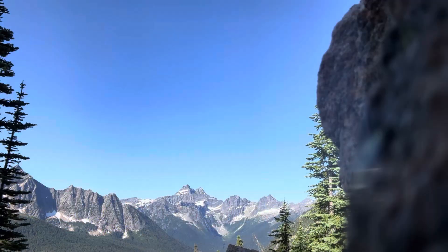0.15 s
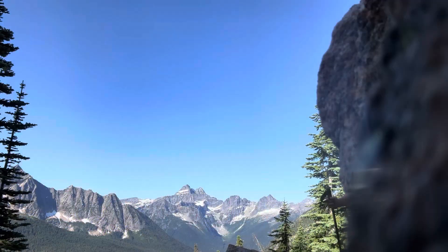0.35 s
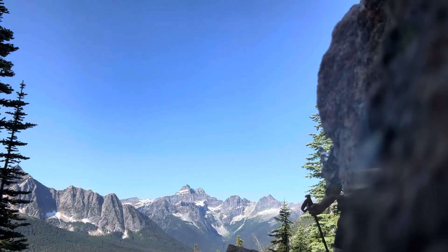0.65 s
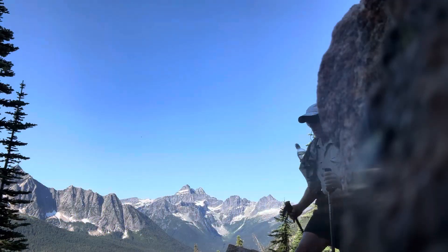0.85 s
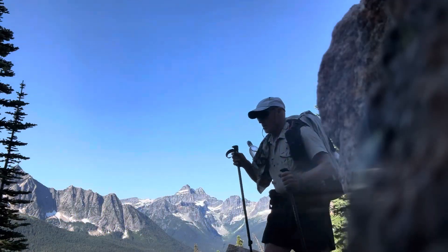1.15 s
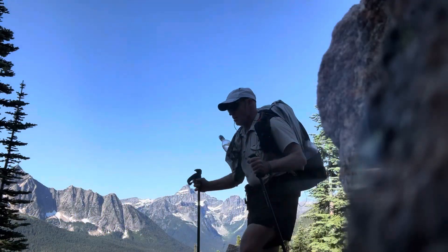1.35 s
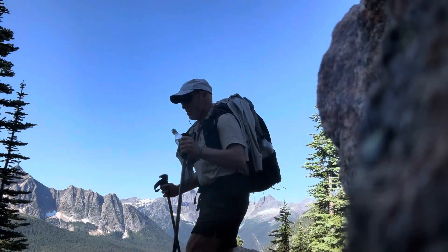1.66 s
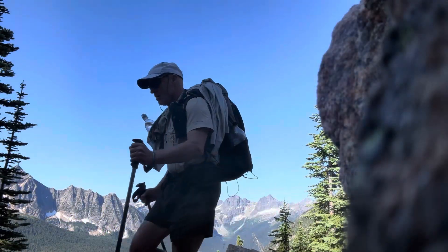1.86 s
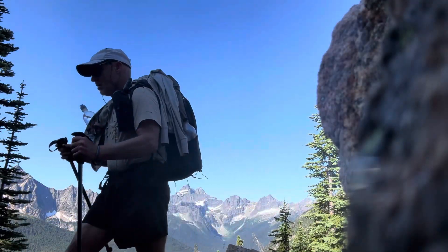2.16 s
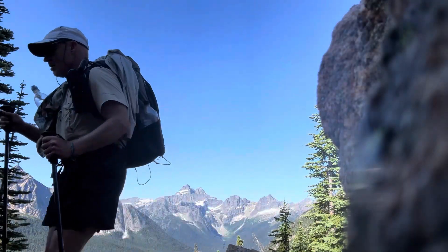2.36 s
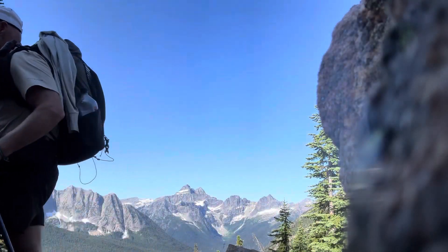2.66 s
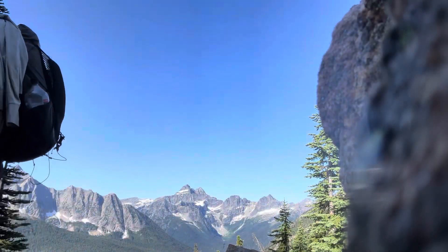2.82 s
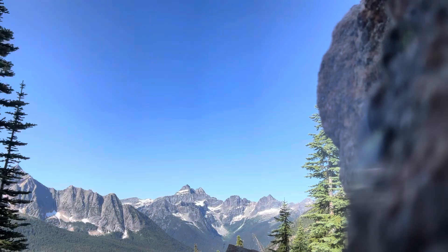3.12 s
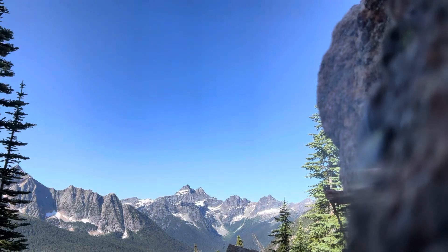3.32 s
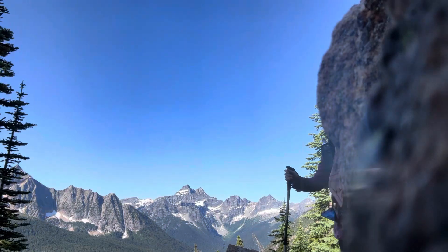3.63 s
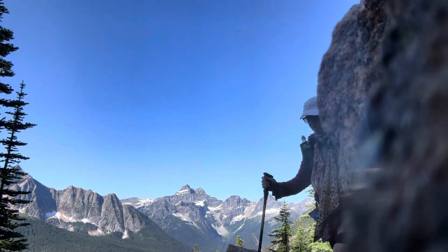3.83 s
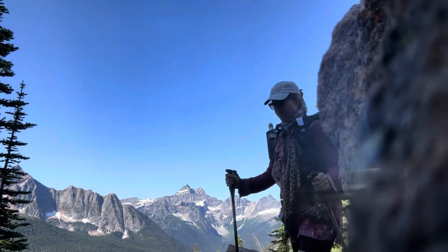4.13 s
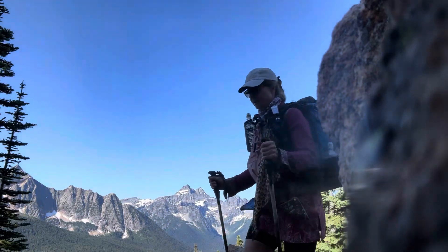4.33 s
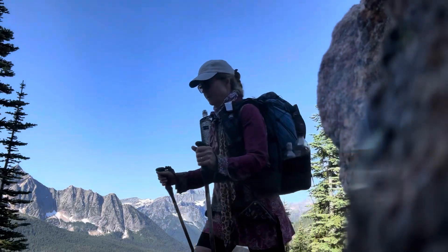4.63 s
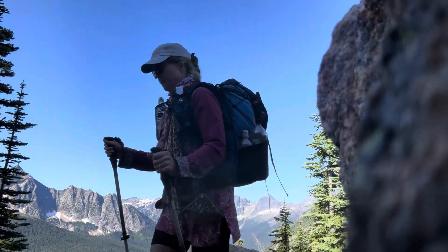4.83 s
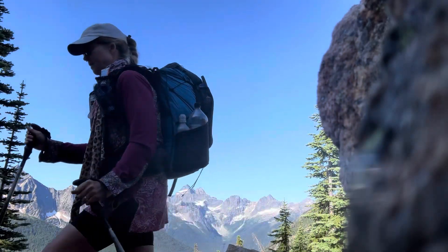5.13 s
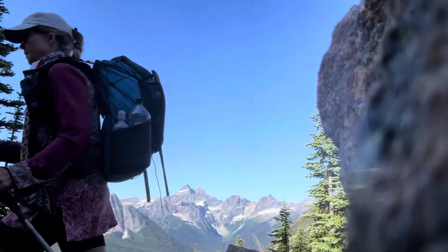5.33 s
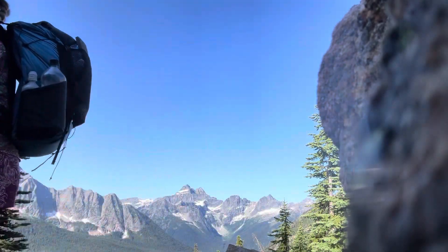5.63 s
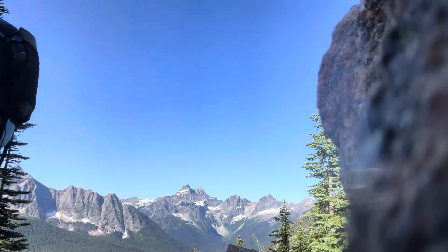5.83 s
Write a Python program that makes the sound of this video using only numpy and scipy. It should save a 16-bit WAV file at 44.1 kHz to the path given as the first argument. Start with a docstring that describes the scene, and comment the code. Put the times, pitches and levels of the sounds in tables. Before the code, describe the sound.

A close stereo outdoor scene on a stony mountain trail as two hikers pass with poles. A crisp pole tip click lands at about 0.3 s, with a light scuff and soft thud near 0.5 s. Around 0.9-1.05 s boots knock stone with low, short thuds, and bright hard clicks crack at 1.4 s. Small grit scrapes and taps follow. From 2.25 to 2.8 s it is busiest: sharp strikes at 2.35 s, the loudest crack at 2.6 s, then rattling small stones and gravel. A heavy thud comes at 3.3 s, a bright pole click at 3.67 s, knocks near 3.85 and 4.05 s. After a lull, a stony knock at 4.55 s leads into a soft scuff; fainter taps continue, with a clearer knock at 5.3 s and light steps to 6 s. Faint cloth swishes, quiet air and a low wavering hum lie underneath; balance eases left to right.

```python
"""On a stony mountain path two walkers with poles pass close by, their balance leaning from left to right.
Pole tips and boot edges crack on rock: bursts of random grit clicks drive damped modes of shafts and stones.
Heels thud as decaying sines that sink in pitch; soles and cloth are clumped grains shaped by strokes.
Coloured noise gives the open air, narrow-band noise a faint wavering hum; two close ports listen."""
import sys
import numpy as np
from scipy import signal
from scipy.fft import rfft, irfft
from scipy.io import wavfile

SR = 44100
rng = np.random.default_rng(int(sys.argv[2]) if len(sys.argv) > 2 else 0)


def store_wav(level_fs):
    """Save 16-bit WAV to argv[1]."""
    pcm = np.round(np.clip(np.atleast_2d(level_fs), -1, 1) * 32767)
    wavfile.write(sys.argv[1], SR, pcm.T.astype(np.int16))


N = 263718


def amp(db):
    """Level law: an amplitude ratio is ten to the power of decibels over twenty."""
    return 10 ** (np.asarray(db) / 20)


def rms_one(x):
    """Power normalisation: scale to a root mean square of 1."""
    return x / np.sqrt(np.mean(x ** 2) + 1e-20)


def in_time(rows):
    """Linear interpolation of each column over the time in the first."""
    s, *columns = np.transpose(rows)
    t = np.arange(N) / SR
    return [np.interp(t, s, column) for column in columns]


def band(x, low_hz, high_hz):
    """Band-pass filtering with maximally flat Butterworth response."""
    sos = signal.butter(2, [low_hz, high_hz], "band", fs=SR, output="sos")
    return signal.sosfilt(sos, x)


def coloured(x, spectrum):
    """Spectral shaping: gains in dB, interpolated over log frequency, weight the spectrum."""
    hz, db = np.transpose(spectrum)
    f = np.maximum(np.fft.rfftfreq(N, 1 / SR), 1)
    gain = amp(np.interp(np.log(f), np.log(hz), db))
    return irfft(rfft(x) * gain, N)


def drift(rate_hz):
    """Low-passed noise: a double pole leaves slow random fluctuation of rms 1."""
    pole = np.exp(-2 * np.pi * rate_hz / SR)
    noise = rng.standard_normal(N + SR)
    slow = signal.lfilter([1], [1, -2 * pole, pole * pole], noise)
    return rms_one(slow[SR:])      # the first second lets the filter settle


def grains(per_s, spread_db):
    """Shot noise: random clicks of uneven size and either sign; rms 1."""
    sizes = amp(spread_db * np.minimum(rng.exponential(1, N), 4))
    signed = sizes * rng.choice([-1, 1], N)
    return rms_one(signed * (rng.random(N) < per_s / SR))


def body(clicks, modes):
    """Modal synthesis: parallel damped resonators, the drive of each wavering in level."""
    out = 0
    for k, (hz, db, t60) in enumerate(modes):
        radius = amp(-60 / (t60 * SR))
        w = 2 * np.pi * hz / SR
        force = clicks * amp(db + 2 * drift(58.6)) * (-1) ** k
        resonator = [1, -2 * radius * np.cos(w), radius * radius]
        out = out + signal.lfilter([0, np.sin(w)], resonator, force + 1e-18)
    return out


def hits():
    """Impact excitation: a blow in a first break, then dying grit, drives shaft, stones and bare crack."""
    # tips, boot edges and kicked stones on rock: start_s, level_db, stone_knock_db and
    # bright_crack_db (both relative to level_db), contact_pitch_hz
    contacts = [(0.2723, -28, -7, -5, 2190), (0.330, -51.5, 10.5, -5, 1420), (0.885, -33, -15, -4, 1780),
                (0.9653, -55, 22.5, -3, 1580), (1.001, -35, 11, -18, 2240), (1.036, -34, 6.5, -25, 1600),
                (1.3755, -24.5, -5.5, 0.5, 3400), (1.3818, -25, -2.5, -33, 1910),
                (1.4072, -39.5, 1, -33, 2220), (1.582, -49, 7, -13, 1640), (1.8648, -43.5, 0.5, 4, 3210),
                (1.903, -41.5, 2.5, -3.5, 2180), (2.0205, -47, 19.5, -14, 1490),
                (2.157, -50, 17.5, 1, 1520), (2.254, -35.5, -7, -15.5, 1830),
                (2.3433, -24.5, -0.5, -14.5, 1780), (2.36, -28, -9, -28, 3520), (2.5067, -32, 6, -41, 1530),
                (2.541, -48, 12.5, -6, 2000), (2.6016, -18.5, -1.5, -23.5, 1960),
                (2.6885, -41, 16.5, -35, 1890), (2.704, -42, 4, -28, 3180), (2.7197, -42, -4, -29, 1470),
                (2.7354, -29.5, -19, -21.5, 4150), (2.787, -31.5, -8, -11, 4050),
                (2.8075, -31, 0, -48, 1510), (2.903, -57.5, -10, 4.5, 3040), (2.9745, -32.5, -3, -14, 1490),
                (3.0874, -37, 1, 1.5, 3050), (3.0947, -38.5, -15, -24, 3600),
                (3.1543, -34.5, -4, -13.5, 1520), (3.1918, -41, 9.5, -3.5, 2890),
                (3.227, -53, 20.5, -17, 1510), (3.292, -52.5, 14, 11, 2550),
                (3.3035, -36.5, 12.5, -8.5, 3800), (3.367, -50.5, 19, -22, 1480),
                (3.422, -37.5, -21, -30, 1520), (3.4586, -33, -37, -24, 4000), (3.5, -38, -5, -29, 3830),
                (3.6668, -26.5, -8.5, -2.5, 3310), (3.8434, -39, -5, -1, 3000),
                (3.8517, -31.5, 3.5, -8, 1420), (3.968, -53, 18.5, -27, 1610),
                (4.0467, -39, 5.5, -15, 1750), (4.538, -40.5, -6, -7, 1830), (4.566, -35, 8.5, -56, 1250),
                (5.0261, -46, -5, -40, 2540), (5.055, -48.5, 0, -16.5, 2730),
                (5.1122, -45.5, 1, -6.5, 1820), (5.2006, -48, -8, -27, 2930), (5.262, -66, 20, -32, 1480),
                (5.2943, -32, 7.5, -24.5, 1760), (5.406, -53.5, 16, -3, 1560),
                (5.7407, -45.5, 9, -16, 2000), (5.8382, -47, 16.5, -41, 1620),
                (5.940, -48.5, 14, -7.5, 1530), (5.96, -41.5, -5, -7, 2450)]
    # pole shaft resonances: pitch_hz, relative_drive_db, t60_s
    shaft_modes = [(1520, 6, 0.01), (1994, 11, 0.0037), (2940, 10, 0.0047), (3202, -1.5, 0.016),
                   (3840, 3, 0.0091), (4026, 5, 0.0051)]
    # loose stone resonances: pitch_hz, relative_drive_db, t60_s
    stone_modes = [(453, -4, 0.014), (585, 5, 0.019), (783.6, -2, 0.054), (965, 10, 0.0063)]
    # colour of the bare crack: frequency_hz, gain_db
    crack_colour = [(2500, -30), (4800, 3.5), (6500, 8.5), (8500, 3.5), (13000, -8.5), (16000, -9)]
    rise_s, first_break_s = 0.0011, 0.002      # time constants
    first_break = 3.66      # height over the crunch, before the rise
    crunch_t60_s = 0.11     # for a crack at 0 dB
    click_db = 19           # the one clean blow, over the contact level
    broad_db = -7           # unpitched share of a contact

    force = np.zeros((4, N))
    grit = rms_one(grains(6000, spread_db=2.2) * amp(2.6 * drift(120)))
    t = np.arange(SR // 5) / SR
    for s, db, knock_db, crack_db, hz in contacts:
        i = round(s * SR)
        t60 = crunch_t60_s * amp(0.17 * crack_db)      # a bright contact bites into grit and crunches longer
        decay = amp(-60 * t / t60) + first_break * np.exp(-t / first_break_s)
        burst = (1 - np.exp(-t / rise_s)) * decay
        breaking = amp(db) * burst[:N - i] / burst.max() * grit[i:i + len(t)]
        bare = amp(crack_db) * breaking      # without the clean blow: the bare crack is breaking grit alone
        breaking[round(rise_s * SR)] += amp(db + click_db) * rng.choice([-1, 1])
        pitched = amp(5) * band(breaking, hz / 1.1, hz * 1.1)
        force[:, i:i + len(t)] += pitched, breaking, amp(knock_db) * breaking, bare

    pitched, broad, stones, bare = force
    broad = band(broad, 1560, 5400)
    knock = amp(-26.5) * body(stones, stone_modes) + amp(6.0) * band(stones, 218, 843)
    ringing = amp(-26.5) * body(pitched + amp(-2.5) * broad, shaft_modes)
    crack = amp(1) * coloured(bare, crack_colour)
    return pitched + amp(broad_db) * broad + ringing + knock + crack


def thuds():
    """Damped oscillation: landing weight rings the ground, sinking in pitch over a deeper, longer ring."""
    # weight landing on the ground: start_s, relative_level_db, first_over_final_pitch (ratio), final_pitch_hz
    landings = [(0.549, -53.5, 1.6, 201), (0.888, -48.5, 1.44, 219), (0.974, -45, 1.56, 220),
                (1.005, -36.5, 2.95, 174), (1.039, -41, 2.14, 164), (1.385, -35, 1.35, 190),
                (1.583, -44.5, 1.75, 160), (2.165, -40, 2, 109), (2.356, -49, 1.1, 95),
                (2.512, -50, 1.45, 165), (2.774, -41.5, 1.5, 223), (2.853, -43, 1.22, 231),
                (2.982, -48, 1.5, 89.5), (3.101, -38, 2.1, 121), (3.156, -46.5, 2.1, 129),
                (3.3055, -30.5, 3.6, 154), (3.382, -43, 1.54, 195), (3.685, -44.5, 3, 120),
                (3.86, -39.5, 1.94, 283), (4.05, -45.5, 2.3, 138), (4.566, -43.5, 1.63, 203),
                (4.654, -48, 1.46, 245), (5.74, -55.5, 1.26, 246), (5.845, -52.5, 2.23, 183),
                (5.929, -49, 1.3, 225), (5.96, -44.5, 1.7, 213)]
    # deep ring under every thud, its pitch scaled at random: base_pitch_hz, relative_level_db, t60_s
    deep_hz, deep_db, deep_t60 = (92, -14, 0.25)
    near_t60_s = 0.055
    rise_s, sink_s = 0.00061, 0.0042      # time constants of the push and of the pitch settling
    thud_gain_db = 13      # overall loudness of the thuds

    out = np.zeros(N)
    t = np.arange(SR // 5) / SR
    for s, db, start, hz in landings:
        i = round(s * SR)
        turns = hz * (t + (start - 1) * sink_s * (1 - np.exp(-t / sink_s)))
        near = amp(-60 * t / near_t60_s) * np.sin(2 * np.pi * turns)
        deep_turns = deep_hz * rng.uniform(0.49, 1.47) * t
        deep = amp(deep_db - 60 * t / deep_t60) * np.sin(2 * np.pi * deep_turns)
        push = amp(db + thud_gain_db) * (1 - np.exp(-t / rise_s))
        out[i:i + len(t)] += (push * (near + deep))[:N - i]
    return out


def rubbing():
    """Granular friction: soles roll stones and crush grit in clumps, cloth hisses, the ground rumbles."""
    # soles drag and settle in gravel: start_s, length_s, rolling_stones_db,
    # grit_db and ground_rumble_db (both relative to the stones)
    scuffs = [(0.181, 0.16, -54.5, -16, -26), (0.29, 0.012, -48.5, 3.5, 2), (0.497, 0.079, -55, -3.5, 1.5),
              (0.895, 0.15, -52.5, -0.5, 8.5), (1.113, 0.022, -53, 1.5, 2),
              (1.488, 0.046, -46.5, -5.5, -3.5), (1.593, 0.011, -47, -4, 5),
              (1.668, 0.0053, -40.5, -2, -13), (2.16, .14, -56.5, 1.5, 3.5), (2.612, 0.14, -47, -8.5, -3),
              (2.749, 0.068, -49, 7, 7), (2.856, 0.019, -45, 0.5, 4), (2.987, 0.051, -60, 1, 6),
              (3.161, 0.062, -57.5, 2, 8), (3.293, 0.16, -56.5, 4.5, 7.5), (3.864, 0.044, -57.5, 6, 9.5),
              (4.003, 0.042, -55, 6.5, 7), (4.636, 0.2, -53.5, -3.5, 0.5), (5.048, 0.56, -59.5, -1.5, 3.5),
              (5.361, 0.035, -49, -7.5, -1), (5.73, 0.13, -55.5, -6, -13), (5.933, 0.1, -50.5, -14, 1)]
    # cloth, straps and brushing soles: start_s, length_s, level_db
    swishes = [(0.492, 0.052, -46), (1.114, 0.0043, -49.5), (1.917, 0.17, -58.5), (2.12, 0.4, -58.5),
               (2.78, 0.096, -53.5), (3.331, 0.16, -60.5), (4.483, 0.35, -71), (5.182, 0.444, -64)]
    # continuous shuffle of the walkers between the steps: time_s, rolling_stones_db
    shuffle_levels = [(0, -56), (.1, -75.5), (.4, -65.5), (.8, -63.5), (1.1, -64.5), (1.8, -63.5),
                      (2.0, -55.5), (2.85, -54), (3.05, -63), (3.5, -62.5), (4.1, -60.5), (4.42, -68),
                      (4.6, -54), (5.0, -63.5), (5.45, -59), (5.7, -65.5), (5.98, -54.5)]
    # colour of cloth: frequency_hz, gain_db
    cloth_colour = [(2500, 2), (4800, 3), (7000, 9), (9000, -3), (13000, -8), (16000, -11.5)]
    shuffle_grit_db, shuffle_swish_db, shuffle_rumble_db = -4, -12.5, 0      # relative to its stones

    shuffle_db, = in_time(shuffle_levels)
    s, length, db, grit_db, rumble_db = np.transpose(scuffs)
    grind_gain = strokes(s, length, db, shuffle_db)
    grit_gain = strokes(s, length, db + grit_db, shuffle_db + shuffle_grit_db)
    swish_gain = strokes(*np.transpose(swishes), shuffle_db + shuffle_swish_db)
    rumble_gain = strokes(s, length, db + rumble_db, shuffle_db + shuffle_rumble_db)

    clumps = drift(55)      # shared, so that stones, grit and cloth surge together
    rolling = grains(500, spread_db=4.5) * amp(3.45 * clumps)
    grind = pebbles(rolling, 640, 1117, cycles=21.3, count=10)
    crushing = grains(1900, spread_db=3.2) * amp(3.0 * clumps)
    grit = pebbles(crushing, 1200, 5500, cycles=24.0, count=18)
    fibres = grains(9900, spread_db=-8.0) * amp(3.2 * clumps + 3.9 * drift(14))
    swish = coloured(fibres, cloth_colour)
    rumble = band(rng.standard_normal(N), 65, 480) * amp(3 * drift(12))
    return (grind_gain * rms_one(grind) + grit_gain * rms_one(grit)
            + swish_gain * rms_one(swish) + rumble_gain * rms_one(rumble))


def pebbles(clicks, low_hz, high_hz, cycles, count):
    """Size-dependent resonance: clicks fall on pebbles of many pitches and places, small ones fainter; rms 1."""
    dealt = rng.integers(0, count, N)
    out = 0
    for k, hz in enumerate(np.geomspace(low_hz, high_hz, count)):
        side_db = rng.normal(0, 8)
        sides = rms_one(amp([[side_db], [-side_db]]))
        ring = rms_one(body(clicks * (dealt == k), [(hz, 0, cycles / hz)]))
        out = out + sides * hz ** -.7 * ring
    return rms_one(band(out, low_hz / 2, high_hz * 3))      # rounded stones touch softly


def strokes(starts, lengths, levels_db, between_db):
    """Power addition: strokes that rise fast, hold and die away add on the shuffle; gives a gain over time."""
    rise_db_per_s, fall_db_per_s = 508, 481
    t = np.arange(N) / SR
    power = amp(2 * between_db)
    for s, length, db in zip(starts, lengths, levels_db):
        near = slice(max(round((s - .1) * SR), 0), round((s + length + .3) * SR))
        before_s = np.maximum(s - t[near], 0)
        after_s = np.maximum(t[near] - s - length, 0)
        edge_db = rise_db_per_s * before_s + fall_db_per_s * after_s
        power[near] += amp(2 * (db - edge_db))
    return np.sqrt(power)


def surroundings(x):
    """Early reflection: delayed dull copies, of opposite sign and other level at each port."""
    # off boulder and ground: delay_s, left_db, right_db
    echoes = [(.0061, -8, -13.5), (0.0101, -7, -9)]
    out = x.copy()
    dull = band(x.mean(axis=0), 370, 11000)
    for s, left_db, right_db in echoes:
        lag = round(s * SR)
        out[:, lag:] += amp([[left_db], [right_db]]) * dull[:-lag] * [[1], [-1]]
    return out


def air():
    """Partial coherence: wide noise partly alike at both ports, with a narrow-band hum common to both."""
    # colour of still air: frequency_hz, gain_db
    air_colour = [(30, 7), (189, -0.5), (437, -14), (780, -20), (3140, -26), (14400, -45), (16000, -45)]
    air_db = -61.5
    hum_hz, hum_width_hz, hum_db = 181, 22, -68      # the hum wavers about this level

    shared = rng.standard_normal(N)
    own = rng.standard_normal((2, N))
    wide = amp(air_db) * rms_one(coloured(shared + own, air_colour))
    hum = band(rng.standard_normal(N), hum_hz - hum_width_hz / 2, hum_hz + hum_width_hz / 2)
    return wide + amp(hum_db + 2 * drift(0.98)) * rms_one(hum)


def scene():
    """Superposition with level panning: near sounds lean to the nearest walker, over the air."""
    # where the nearest walker is: time_s, left_over_right_db
    place = [(0, 1.2), (5.98, -1.6)]
    pan_db, = in_time(place)
    near = (hits() + thuds() + rubbing()) * amp([pan_db / 2, -pan_db / 2])
    return surroundings(near) + air()


def record(dry):
    """Frequency-dependent port response: the housing turns phase and level; bass and top are cut."""
    # phase between the ports: frequency_hz, left_lead_rad
    port_phase = [(0, 0), (430, 0), (950, 2.1), (1980, -0.3), (2240, -2.3), (4310, 1.8), (5170, 3.0),
                  (7300, 3.4), (9040, 3.9), (11400, 5.8), (12700, 6.3)]
    # level between the ports: frequency_hz, left_over_right_db
    port_balance = [(60, -2), (700, -4.5), (1300, 2.5), (2500, -1.5), (6000, 2.5), (11000, 0)]
    bass_cut_hz, stopband_hz = 52, 17000

    f = np.fft.rfftfreq(N, 1 / SR)
    turn = np.interp(f, *np.transpose(port_phase)) / 2
    tilt = amp(np.interp(f, *np.transpose(port_balance)) / 2)
    response = [tilt * np.exp(1j * turn), np.exp(-1j * turn) / tilt]      # left, right
    ports = irfft(rfft(dry) * response, N)
    ports = signal.sosfilt(signal.butter(4, bass_cut_hz, "high", fs=SR, output="sos"), ports)
    return signal.sosfilt(signal.cheby2(14, 70, stopband_hz, fs=SR, output="sos"), ports)


dry = scene()
out = record(dry)
store_wav(out)
```